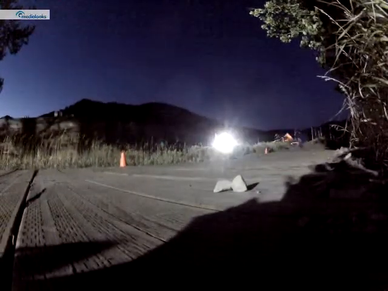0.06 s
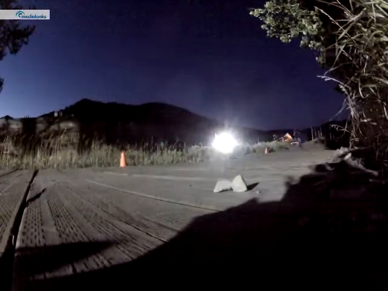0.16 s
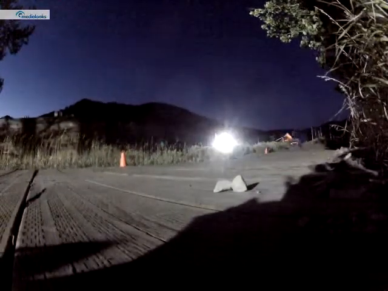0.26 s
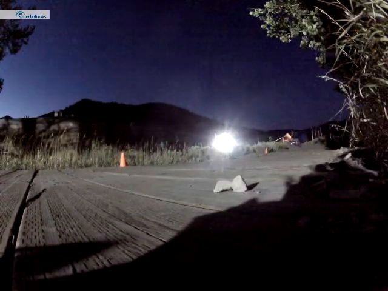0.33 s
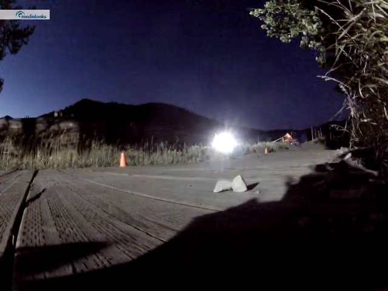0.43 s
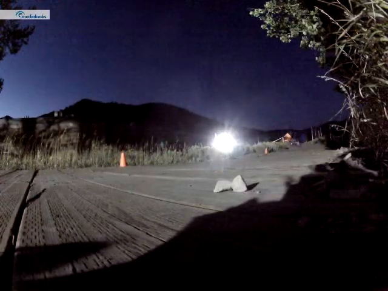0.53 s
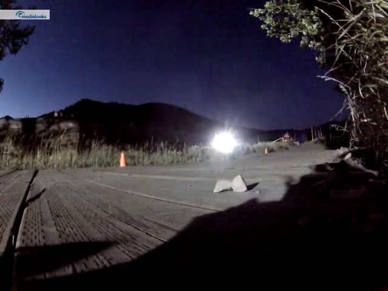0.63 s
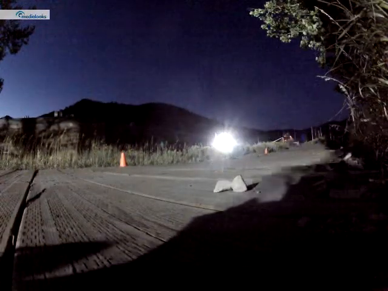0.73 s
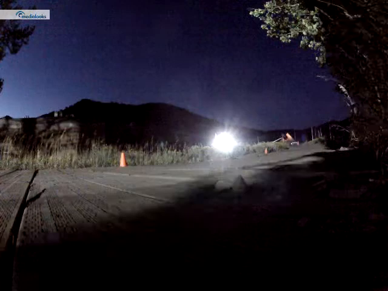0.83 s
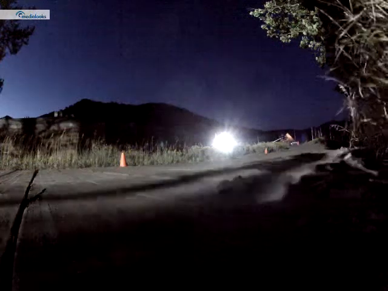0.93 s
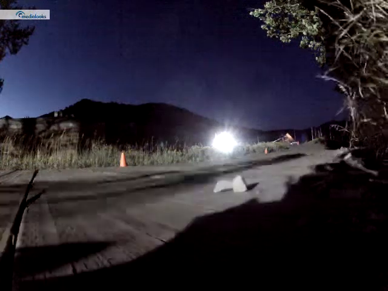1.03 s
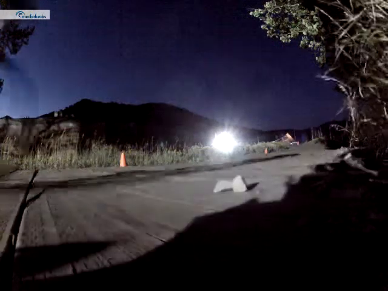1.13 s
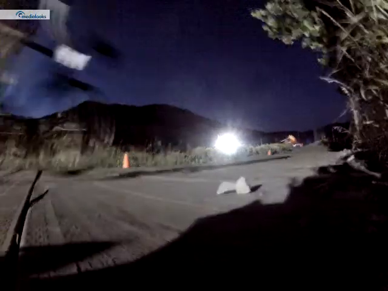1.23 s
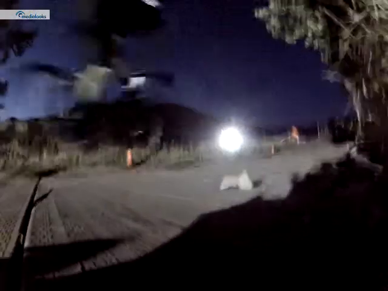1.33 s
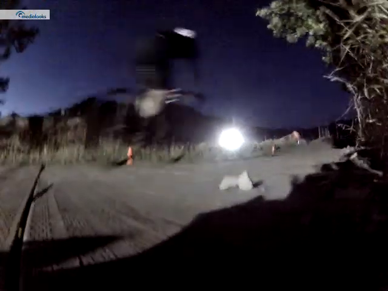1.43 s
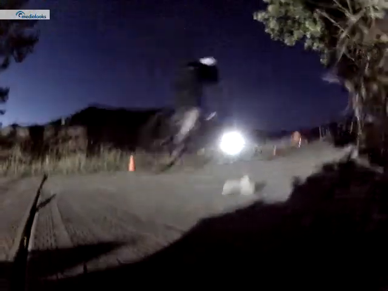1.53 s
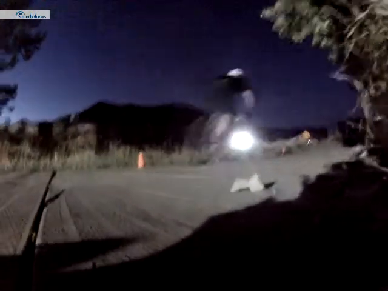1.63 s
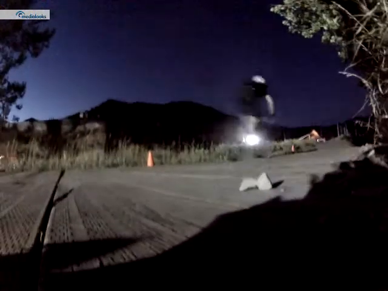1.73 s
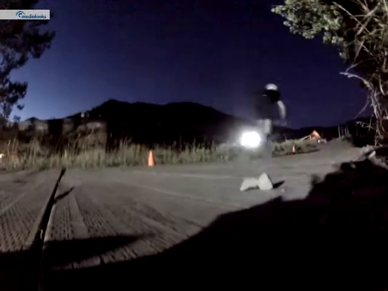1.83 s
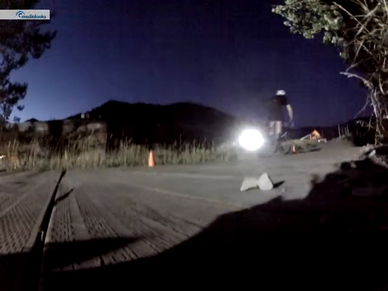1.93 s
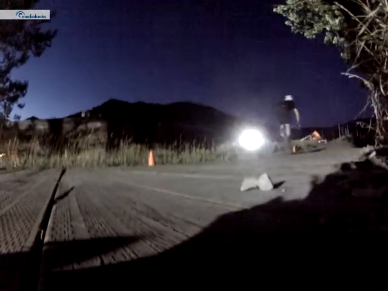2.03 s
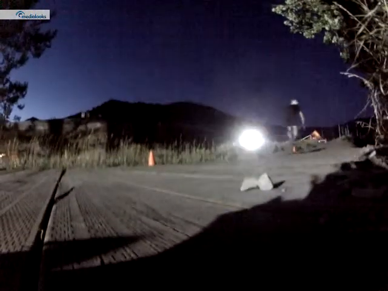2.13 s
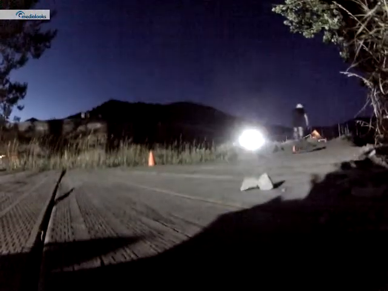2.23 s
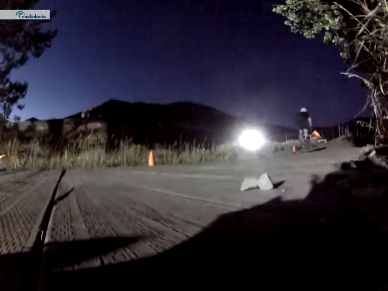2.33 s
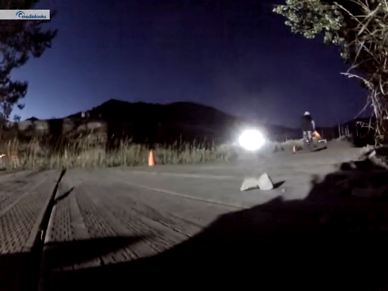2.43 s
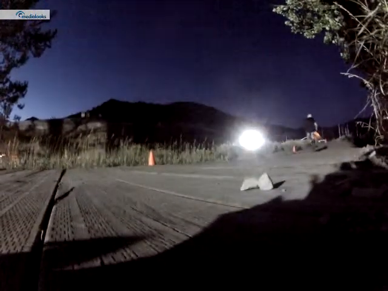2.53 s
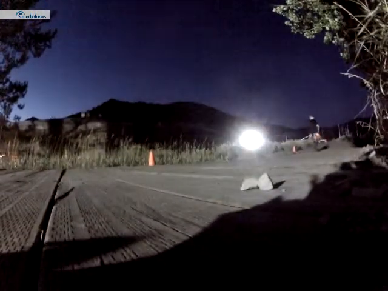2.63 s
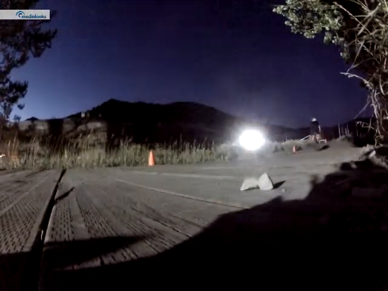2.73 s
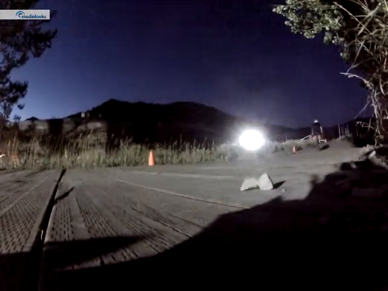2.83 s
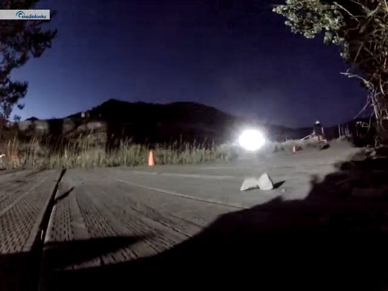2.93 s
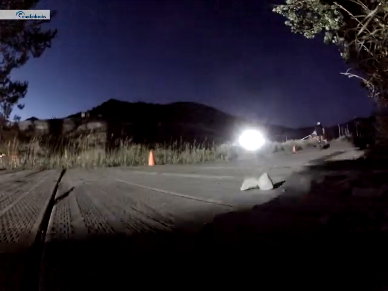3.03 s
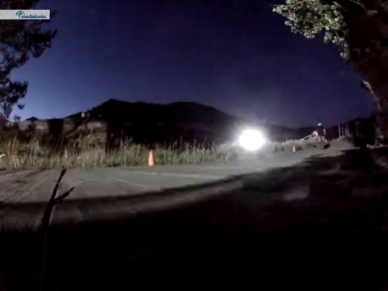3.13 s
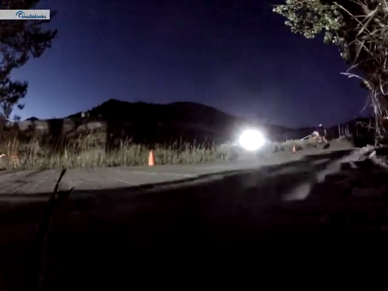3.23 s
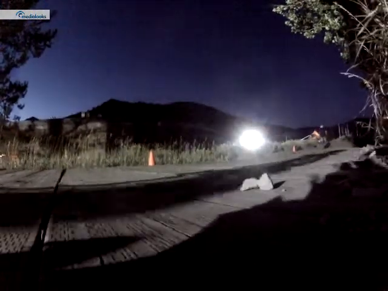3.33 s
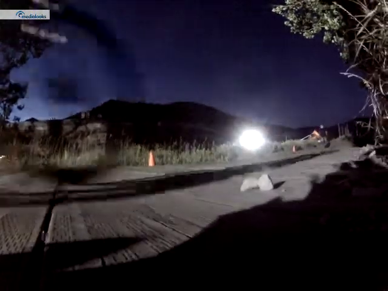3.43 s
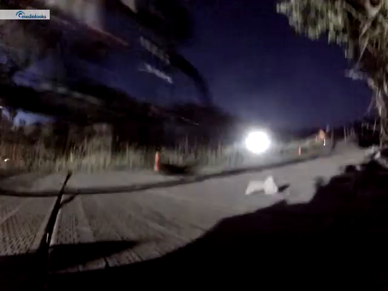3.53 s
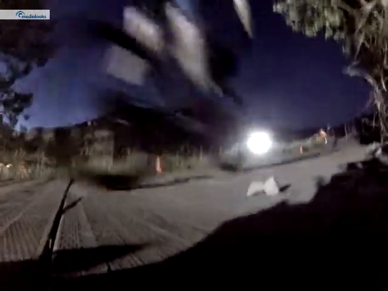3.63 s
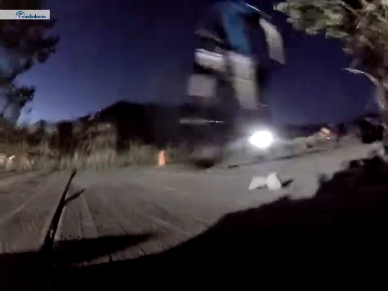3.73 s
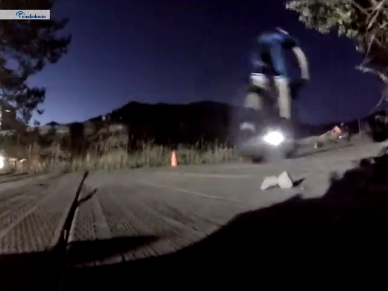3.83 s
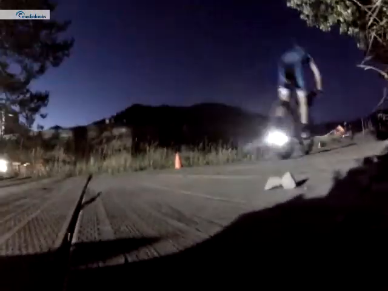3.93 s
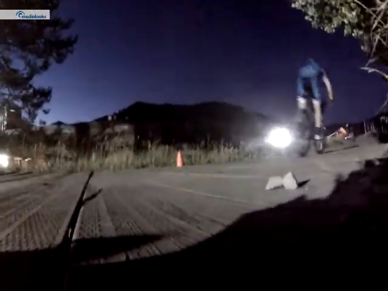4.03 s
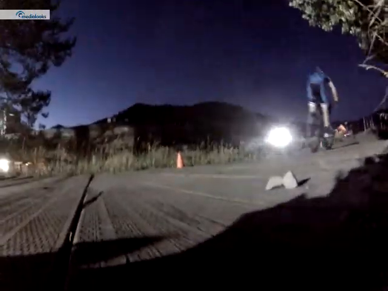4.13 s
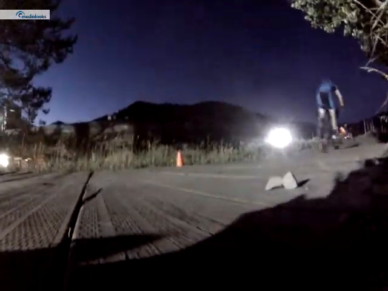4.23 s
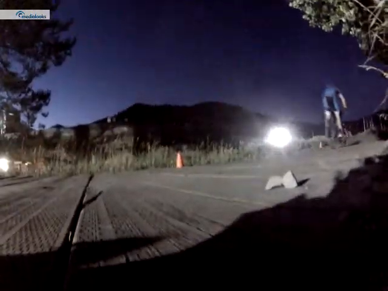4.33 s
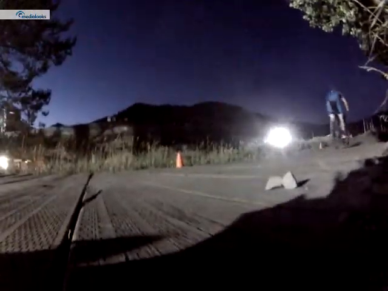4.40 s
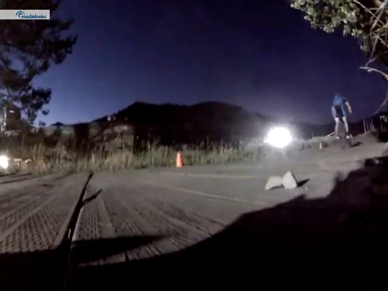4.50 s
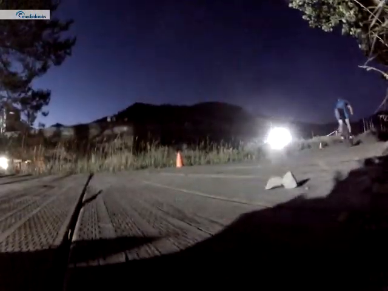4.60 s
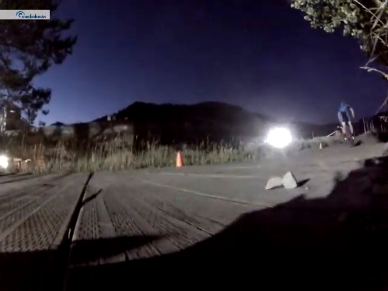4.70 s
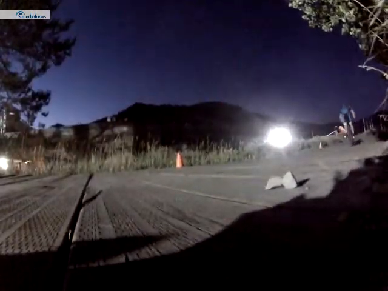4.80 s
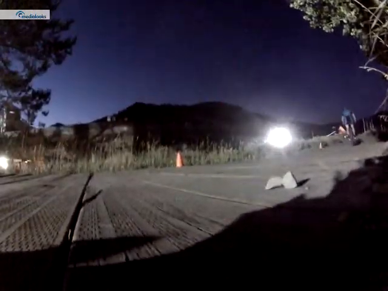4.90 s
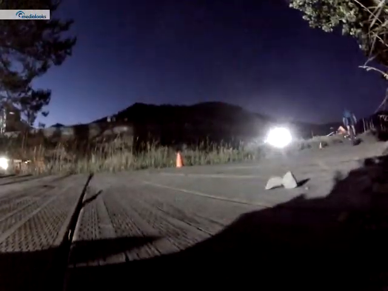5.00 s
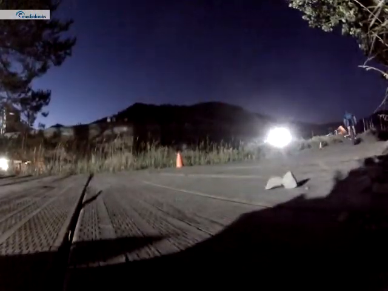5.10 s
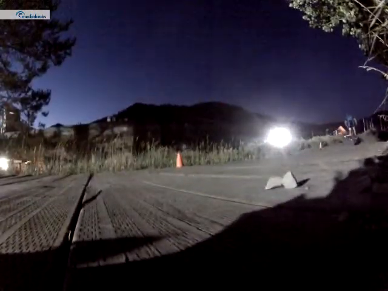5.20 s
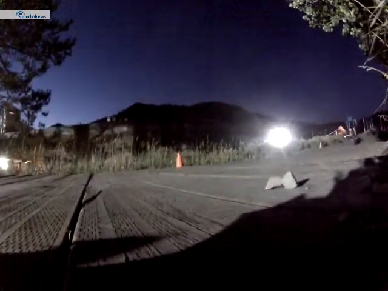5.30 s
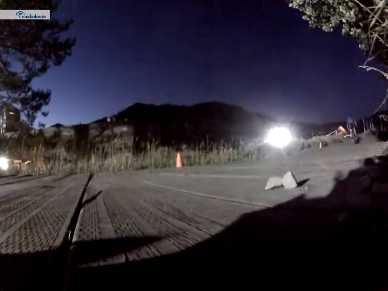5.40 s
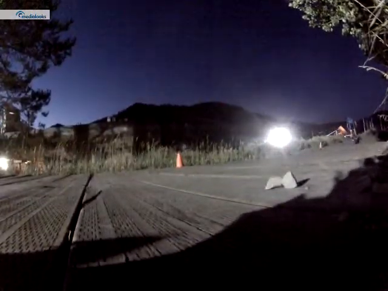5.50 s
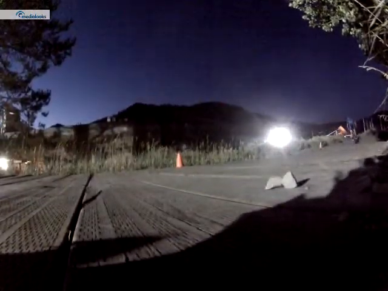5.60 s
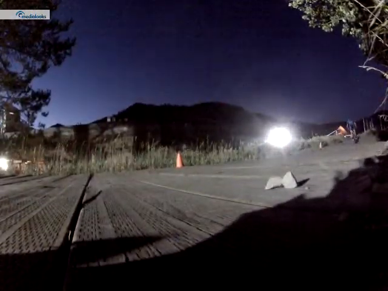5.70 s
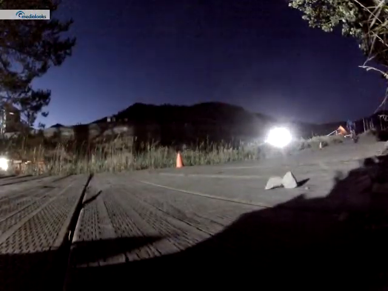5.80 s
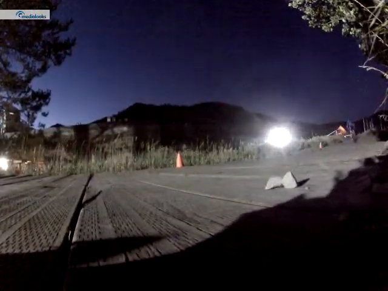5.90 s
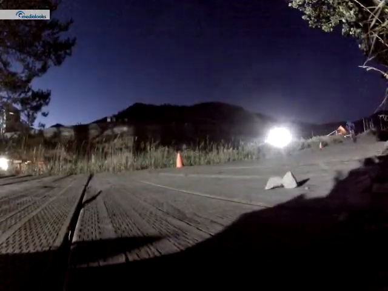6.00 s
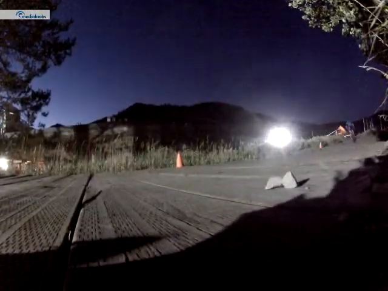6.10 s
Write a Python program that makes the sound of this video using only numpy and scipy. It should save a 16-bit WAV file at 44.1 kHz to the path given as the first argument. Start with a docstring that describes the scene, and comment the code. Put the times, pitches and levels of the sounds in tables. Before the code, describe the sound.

Two abrupt bursts of bicycle tyre rumble and hard clattering knocks on wooden boards, each fading into ticks and then near silence.

```python
"""A faint night hush comes first; then two bicycles, one after the other, roll over a plank deck.
They pass a small camera lying on the boards. Random clicks shake the beams and boards into rumble,
grit rasps in the camera housing, and the deck hums in a wavering tone near 269 Hz. The camera knocks
on the boards and ticks on as each rider leaves, while a low sine is the sway of the whole deck.
The recorder overloads and holds each sample at 12 kHz, which leaves a rough mirrored treble."""
import sys
import numpy as np
from scipy import signal
from scipy.fft import rfft, irfft
from scipy.io import wavfile

SR = 44100
rng = np.random.default_rng(int(sys.argv[2]) if len(sys.argv) > 2 else 0)


def voltage_ratio(decibels):
    """Convert decibels (scalar or array-like) to amplitude ratios, 20 dB per decade."""
    exponent = np.asarray(decibels, float) / 20
    return 10 ** exponent


def wav_out(sig):
    """Save sig, one row per channel (or a flat mono array), as 16-bit PCM at SR to the path in sys.argv[1]."""
    wavfile.write(sys.argv[1], SR, np.round(np.clip(np.atleast_2d(sig).T, -1, 1) * 32767).astype(np.int16))


N = 271215

# the two bicycles: beside the camera at t/s, weight on the deck level/dB,
# time stretch of the approach [ratio], time stretch of the ride away [ratio]
BICYCLES = [(1.25, 1, 1.7, 1.0), (3.5, 0, .9, 1.039)]
# one ride across the deck: t/s from the pass before stretching, then before the bicycle's weight:
# low rumble level/dB, board rumble level/dB, tyre rasp level/dB, deck hum level/dB
RIDE_COURSE = [(-1.4359, -74, -67, -82, -68.5), (-0.2653, -62.5, -67.5, -68.5, -74.5),
               (-0.0164, -54.5, -63.5, -64.5, -54), (-0.02, -35, -44.5, -56, -42.5),
               (0.0237, -15, -16, -31, -23.5), (0.1249, -17.5, -20, -39.5, -26.5),
               (0.3135, -17.5, -20.5, -38, -29), (0.5649, -21.5, -29, -36.5, -32.5),
               (0.6315, -22.5, -33.5, -39.5, -38.5), (0.9067, -29.5, -44, -45.5, -48.5),
               (1.0545, -44, -53.5, -59, -47), (1.2, -54.5, -63, -66.5, -70.5),
               (1.5, -66.5, -67, -78.5, -78.5)]
# brief swells of the rumble, rasp and hum: t/s, half-length/s,
# low rumble level/dB, board rumble level/dB, tyre rasp level/dB, deck hum level/dB
SWELLS = [(1.212, .04, -22.5, -23, -44, -43), (1.522, 0.063, -7.5, -13, -29, -42),
          (1.793, 0.054, -19.5, -25.5, -30.5, -40), (2.063, 0.077, -24.5, -41, -44, -49.5),
          (3.422, .04, -34, -41.5, -51.5, -49), (3.519, .04, -11.5, -13, -25, -30),
          (4.046, 0.07, -24, -22, -35, -30), (4.737, 0.068, -56, -45.5, -68, -42.5),
          (4.852, 0.062, -54, -52, -61.5, -46.5), (4.972, 0.062, -54, -52, -71, -41.5)]
# resonances of the beams under the deck: f/Hz, width/Hz, relative level/dB
BEAM_RESONANCES = [(43.2, 13, -0.5), (59, 22, 4.5), (92.6, 12, 4), (119, 33, -4), (167, 28, -7)]
# resonances of the deck boards: f/Hz, width/Hz, relative level/dB
BOARD_RESONANCES = [(157, 29, -1.5), (207, 44, -1), (320.6, 50, -6.5), (438, 20, -8.5), (598, 110, -14),
                    (710, 17, -10.5)]
# resonances of the camera housing: f/Hz, width/Hz, relative level/dB
HOUSING_RESONANCES = [(613, 590, -10.5), (1215, 300, -2.5), (1450, 350, -2.5), (1910, 470, -4),
                      (2430, 170, -2), (3133, 190, -13.5), (3680, 210, -11.5), (5100, 1000, -24.5)]
# the camera lands on the boards: t/s, then before the gains of the knock functions:
# crack level/dB, low thump level/dB, board ring level/dB, hard edge level/dB
LANDINGS = [(1.2497, -20, -7.5, -9, -4), (1.2681, -2, -11.5, -6, 1.5), (1.2917, 0, -25.5, -16.5, 12.5),
            (1.3345, -2, -34.5, -13, 1.5), (1.3632, -8, -18, -24, 1.5), (1.3915, 0.5, -9, -19, 1),
            (1.4302, -8.5, -16.5, -8, 6.5), (1.4901, -6.5, -25.5, -4.5, 1.5), (1.5329, 1, -7.5, -14, 13),
            (1.5613, -3.5, -27.5, -19.5, 3), (1.6, 2, -18, -15, 6.5), (1.6444, -4, -18.5, -9.5, 12.5),
            (1.6824, -5, -25.5, -9.5, -7), (1.726, -6.5, -10.5, -8.5, 1), (1.752, -9.5, -27, -9.5, 2),
            (1.7852, -7, -26, -10.5, 3.5), (1.8059, -14, -20.5, -14, -5), (2.0204, -20, -13.5, -48, -11),
            (2.0514, -27, -12, -24, -12), (2.16, -29, -45, -32, -12.5), (2.2065, -31.5, -19.5, -52, -15.5),
            (2.2585, -35, -32, -61, -12.5), (2.2939, -32, -36, -70, -18.5),
            (2.3411, -29.5, -42, -49, -19.5), (2.392, -46, -53.5, -66, -28), (2.52, -45.5, -59.5, -68, -36),
            (2.6189, -42, -45, -68.5, -30), (2.7115, -41, -58.5, -60, -31), (3.468, -26.5, -23, -20, -14.5),
            (3.4834, -19, -9.5, -10.5, -9.5), (3.5042, -7.5, -5, -7.5, 1), (3.5268, -5, -8, -5.5, 1.5),
            (3.5596, -9, -0.5, -19.5, -3), (3.5707, -11.5, 3.5, -2, 3), (3.5896, -1.5, -3, -10.5, 4),
            (3.6278, -7.5, -12, -10, -7), (3.6679, 2, -16, -23.5, 12.5), (3.697, -11.5, -41, -26, -9),
            (3.7312, -22, -29.5, -17.5, -10.5), (3.7955, 1, -28.5, -8.5, 10.5),
            (3.8321, -13, -15, -9, -2.5), (3.8572, -17, -16, -9, 0), (3.893, 0.5, -17.5, -13.5, 4),
            (3.9195, -15.5, -11.5, -14.5, -6), (3.9657, -15.5, -12.5, -17, -8.5),
            (3.9879, -9, -19, -12, -1.5), (4.0065, -7.5, -22.5, -15.5, -9),
            (4.0459, -18.5, -21.5, -12.5, -8.5), (4.1082, -19.5, -14, -23, -14.5),
            (4.1378, -23.5, -17, -31, -12.5), (4.3779, -32.5, -25, -25, -13),
            (4.4284, -32.5, -26, -55, -18.5), (4.4819, -36, -30, -29.5, -20),
            (4.5318, -37, -25.5, -39, -15), (4.577, -36, -41, -57, -16), (4.6176, -38, -64, -66, -18),
            (4.82, -48.5, -61, -58, -40), (4.84, -46.5, -60, -58, -38), (4.9347, -39.5, -49, -65, -26.5),
            (4.976, -47, -63, -62, -34), (5.0235, -36, -58.5, -54, -27), (5.1122, -39.5, -55, -58, -25.5),
            (5.1608, -24, -45, -59, -19.5)]
# board tones that a knock sets ringing: f/Hz, relative level/dB, time to fall by 60 dB t60/s
KNOCK_TONES = [(328.6, -5.5, 0.096), (430, -10.5, 0.05), (623, -13.5, 0.066), (724.5, -13, 0.11),
               (1131, -17, 0.07), (1214, -13.5, .1), (2920, -30, 0.09)]
# slow sway of the whole span: t/s, f/Hz, rms level/dB
SPAN_SWAY = [(0, 23.74, -52), (1.0, 23.44, -60.5), (1.3, 23.86, -34.5), (2.1, 21.64, -31.5),
             (2.3, 22.43, -30.5), (2.5, 22.49, -44.5), (2.7, 22.22, -42.5), (3.0, 25.15, -41),
             (3.35, 25.98, -44.5), (3.55, 25.13, -41.5), (4.3, 20.79, -25), (4.56, 22.16, -29),
             (4.72, 22.54, -40.5), (4.95, 22.53, -35), (5.5, 22.77, -40), (5.8, 23.68, -45.5),
             (6.14, 23.7, -64)]
# spectrum of the night hush, before it is scaled as a whole: f/Hz, relative level/dB
NIGHT_SPECTRUM = [(24, -25.5), (40, 2.5), (49, -18.5), (87, 1.5), (156, -17.5), (268, -9.5), (297, -19),
                  (2300, -23), (5900, -31.5), (7670, -69.5), (13000, -120)]


def columns(rows):
    """Table columns joined by straight lines in time."""
    s, *rest = np.transpose(rows)
    t = np.arange(N) / SR
    return [np.interp(t, s, column) for column in rest]


def rms_one(x):
    """Scale to unit rms."""
    return x / np.sqrt(np.mean(x ** 2) + 1e-20)


def drift(rate_hz):
    """Slow random wandering with rms 1: noise smoothed twice."""
    r = np.exp(-2 * np.pi * rate_hz / SR)
    noise = rng.standard_normal(N + SR)
    # the first second lets the filter settle
    return rms_one(signal.lfilter([1], [1, -2 * r, r * r], noise)[SR:])


def resonances(x, table):
    """Parallel resonances of alternating sign."""
    out = 0
    for k, (hz, width_hz, db) in enumerate(table):
        r = np.exp(-np.pi * width_hz / SR)
        b = np.array([1, 0, -1]) * (1 - r * r) / 2
        a = [1, -2 * r * np.cos(2 * np.pi * hz / SR), r * r]
        out = out + (-1) ** k * voltage_ratio(db) * signal.lfilter(b, a, x)
    return out


def ring(clicks, hz, t60):
    """A unit click sets a fading sine of starting height 1 ringing."""
    r, w = voltage_ratio(-60 / (t60 * SR)), 2 * np.pi * hz / SR
    return signal.lfilter([0, np.sin(w)], [1, -2 * r * np.cos(w), r * r], clicks + 1e-18)


def grains(per_s, spread_db):
    """Random clicks of uneven size and either sign."""
    sizes = voltage_ratio(spread_db * np.minimum(rng.exponential(1, N), 5)) * rng.choice([-1, 1], N)
    return sizes * (rng.random(N) < per_s / SR)


def ride():
    """Both riders follow the same course; their powers add. Rows: low, board, rasp, hum in dB."""
    s, *layers = np.transpose(RIDE_COURSE)
    t, power = np.arange(N) / SR, 0
    for at, weight_db, coming, going in BICYCLES:
        when = at + s * np.where(s < 0, coming, going)
        levels_db = np.array([np.interp(t, when, layer) for layer in layers])
        power = power + voltage_ratio(levels_db + weight_db) ** 2
    for at, half_s, *db in SWELLS:
        bump = np.exp(-((t - at) / half_s) ** 2)
        power += (voltage_ratio(np.array(db))[:, None] * bump) ** 2
    return 10 * np.log10(power)


def rolling(phase, levels_db):
    """Tyres crossing plank gaps shake beams and boards; grit rasps most at the bottom of the sway."""
    low_db, board_db, rasp_db, _ = levels_db
    beams = resonances(grains(400, spread_db=1.5), BEAM_RESONANCES)
    beams = rms_one(resonances(beams, [(74.2, 94, 0)]))
    # the camera lifts softly and lands sharply: round tops, pointed troughs
    beams = rms_one(beams - 0.14 * (beams ** 2 - 1))
    boards = resonances(grains(500, spread_db=3.0), BOARD_RESONANCES)
    boards = rms_one(resonances(boards, [(330, 390, 0)]))
    # small hops, each a scrape of a few ms, stand on a thin steady rub
    hop_decay = np.exp(-1 / (.003 * SR))
    hops = signal.lfilter([1], [1, -hop_decay], np.abs(grains(140, spread_db=2.8)))
    pressed = voltage_ratio(-5.0 * np.sin(phase)) * (.5 + hops)
    rasp = rms_one(resonances(pressed * grains(4300, spread_db=2.0), HOUSING_RESONANCES))
    rasp = signal.lfilter(*signal.butter(1, 4500, fs=SR), rasp)
    beam_wobble, board_wobble = voltage_ratio(3.5 * np.array([drift(12), drift(20)]))
    low_rumble = voltage_ratio(low_db) * beam_wobble * beams
    board_rumble = voltage_ratio(board_db) * board_wobble * boards
    return low_rumble + board_rumble + voltage_ratio(rasp_db) * rasp


def hum(level_db, hum_hz=269):
    """The deck hums: a sine that wavers in pitch and strength."""
    phase = 2 * np.pi * np.cumsum(hum_hz + 8.0 * drift(14)) / SR
    waver = voltage_ratio(3.0 * drift(15))
    return np.sqrt(2) * voltage_ratio(level_db) * waver * np.sin(phase)


def knock_cracks(at, crack_db, edge_db):
    """Each landing is a short scrape of noise into the housing, with a fading clatter behind it."""
    crack_gain_db, tail_db, tail_ms = 11.0, -15, 14
    usual_ms, length_spread = 4.23, 0.14  # the spread is a share of the length
    t_ms = np.arange(SR // 10) * 1000 / SR
    ms = usual_ms * np.exp(length_spread * rng.standard_normal((len(at), 1)))
    cracks = (1 - np.exp(-t_ms / .15)) * np.exp(-(t_ms / ms) ** 2)
    noise, out = np.sign(rng.standard_normal(N)), np.zeros(N)
    for k, mode in enumerate(HOUSING_RESONANCES):
        # a hard edge reaches the three top resonances, a flat landing does not
        level_db = edge_db if k >= 5 else crack_db + crack_gain_db
        gains = voltage_ratio(level_db + 1.7 * rng.standard_normal(len(at)))
        # the clatter after the crack lasts longer in the low resonances
        tail = voltage_ratio(tail_db) * np.exp(-t_ms / tail_ms * np.sqrt(mode[0] / 1500))
        burst = np.zeros(N)
        for i, gain, shape in zip(at, gains, cracks + tail):
            burst[i:i + len(shape)] += gain * shape
        out += (-1) ** k * resonances(burst * noise, [mode])
    return out


def knock_thumps(at, thump_db):
    """Each landing is also a soft low push: a quickly fading 75 Hz sine."""
    push = np.zeros(N)
    # more pushes start downward than upward
    push[at] = voltage_ratio(thump_db + 8.5) * np.sign(rng.standard_normal(len(at)) - .4)
    return signal.lfilter(*signal.butter(1, 260, fs=SR), ring(push, 75, t60=0.036))


def knock_rings(at, ring_db, ring_gain_db=4.0, rebound_s=.006):
    """On the rebound of each landing the boards ring in several fading tones."""
    out = np.zeros(N)
    for hz, db, t60 in KNOCK_TONES:
        size, sign = rng.standard_normal((2, len(at)))
        clicks = np.zeros(N)
        click_db = ring_db + ring_gain_db + db + 3.5 * size
        clicks[at + round(rebound_s * SR)] = voltage_ratio(click_db) * np.sign(sign)
        out += signal.lfilter(*signal.butter(1, 1500, fs=SR), ring(clicks, hz, t60))
    return out


def knocks(landings):
    """A camera landing excites three things: the housing, a low push and the ringing boards."""
    s, crack_db, thump_db, ring_db, edge_db = np.transpose(landings)
    at = np.round(s * SR).astype(int)
    return knock_cracks(at, crack_db, edge_db) + knock_thumps(at, thump_db) + knock_rings(at, ring_db)


def ticks(levels_db):
    """As each rider leaves the camera rattles in small uneven ticks, given as rows like the landings."""
    # seconds after the pass, before the stretch of the ride away
    after_s = np.linspace(.63, .87, 9)
    jitter_s, spread_db = .008, 2
    # crack over rasp, thump over low rumble, ring over board rumble, edge over rasp
    over_db = [12, 6, 4.2, 30]
    s = np.concatenate([at + after_s * going for at, _, _, going in BICYCLES])
    luck = rng.standard_normal((len(s), 5))
    low_db, board_db, rasp_db, _ = levels_db[:, (s * SR).astype(int)]
    strength_db = np.transpose([rasp_db, low_db, board_db, rasp_db]) + over_db
    return np.column_stack([s + jitter_s * luck[:, 0], strength_db + spread_db * luck[:, 1:]])


def sway():
    """The span's lowest natural movement, a sine of drifting pitch, and its phase."""
    hz, db = columns(SPAN_SWAY)
    phase = 2 * np.pi * np.cumsum(hz) / SR + 0.42
    return np.sqrt(2) * voltage_ratio(db) * np.sin(phase), phase


def night(level_db=-61):
    """Far outdoor hush and recorder hiss: steady noise with a shaped spectrum."""
    hz, db = np.transpose(NIGHT_SPECTRUM)
    f = np.maximum(np.fft.rfftfreq(N, 1 / SR), 1)
    shape = voltage_ratio(np.interp(np.log(f), np.log(hz), db))
    hush = irfft(rfft(rng.standard_normal(N)) * shape, N)
    return voltage_ratio(level_db) * rms_one(hush)


def scene():
    """The rolling, hum, knocks, sway and night hush add up in one channel."""
    span, phase = sway()
    levels_db = ride()
    landings = np.vstack([LANDINGS, ticks(levels_db)])
    riders = rolling(phase, levels_db)
    return (riders + hum(levels_db[3]) + knocks(landings) + span + night())[None]


def top_cut(x):
    """Nothing passes above the cut-off."""
    return signal.sosfilt(signal.butter(12, 16500, fs=SR, output="sos"), x)


def record(dry):
    """Overload, then each 12 kHz sample is held four times, which mirrors the sound around 12 kHz."""
    steady = signal.lfilter(*signal.butter(1, 12, "high", fs=SR), dry)
    loud = np.clip(1.375 * np.tanh(steady / 1.662), -1, 1)
    slow = signal.resample_poly(loud, 40, 147, axis=1)  # down to 12 kHz
    held = np.repeat(slow, 4, axis=1)  # now at 48 kHz
    held = signal.resample_poly(held, 147, 160, axis=1)[:, :N]  # back to SR
    held = np.pad(held, ((0, 0), (0, N - held.shape[1])))
    finished = np.clip(held, -1, 1)
    return top_cut(finished)


dry = scene()
out = record(dry)
wav_out(out)
```